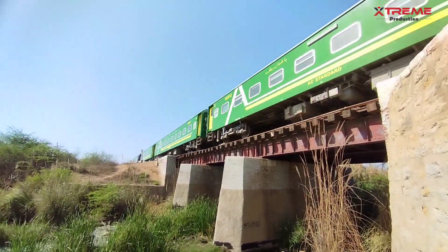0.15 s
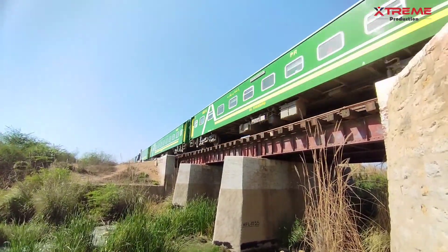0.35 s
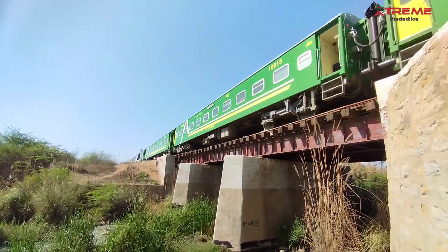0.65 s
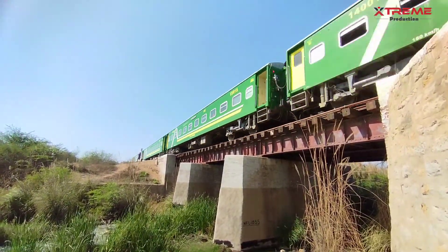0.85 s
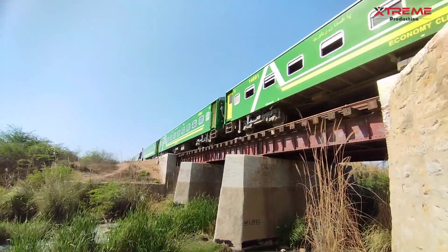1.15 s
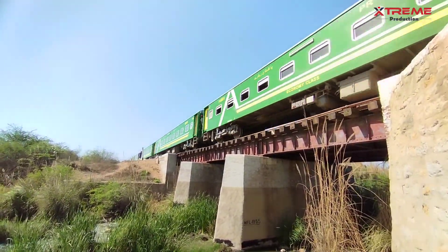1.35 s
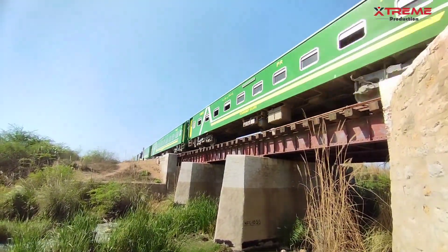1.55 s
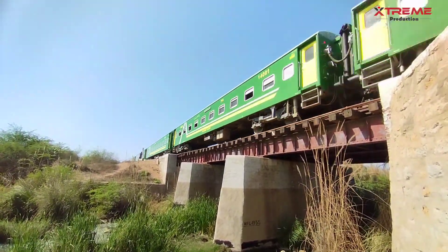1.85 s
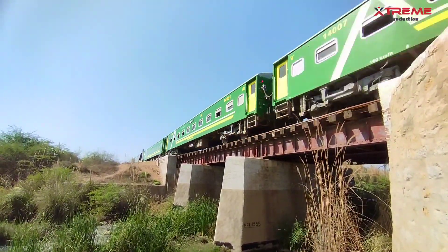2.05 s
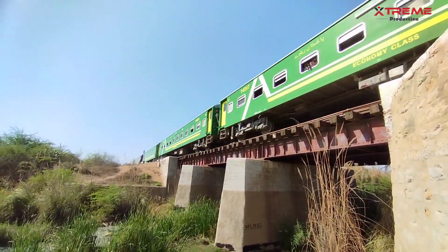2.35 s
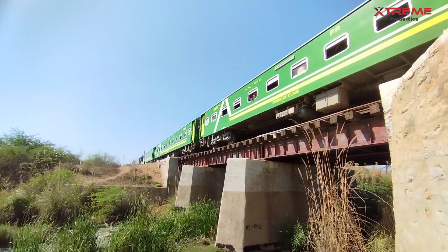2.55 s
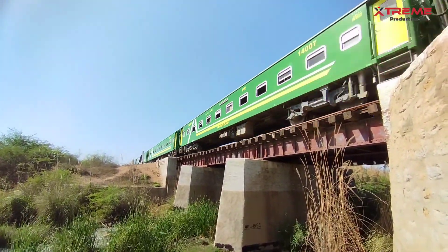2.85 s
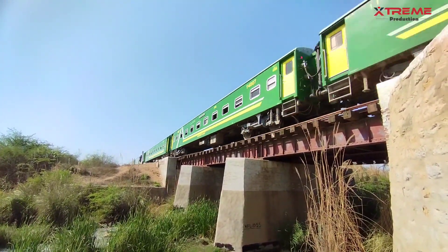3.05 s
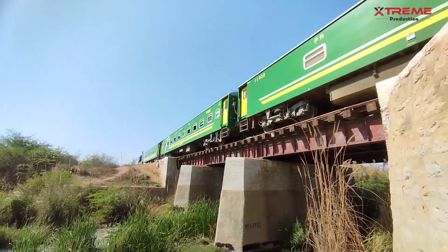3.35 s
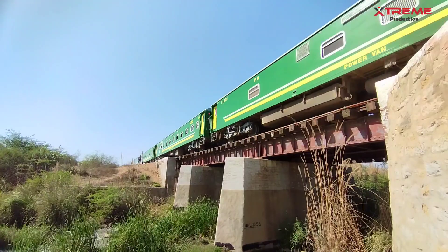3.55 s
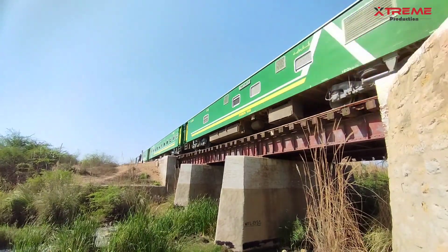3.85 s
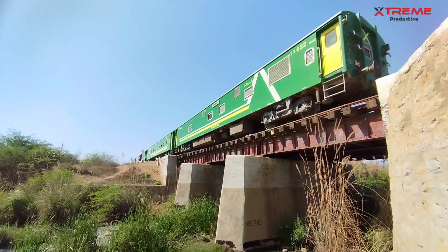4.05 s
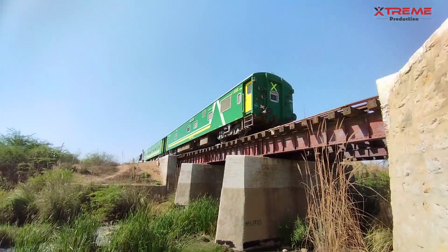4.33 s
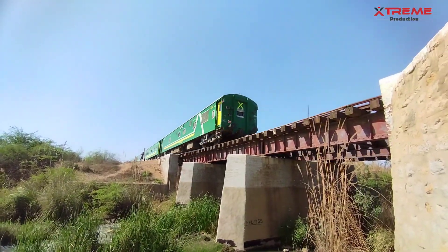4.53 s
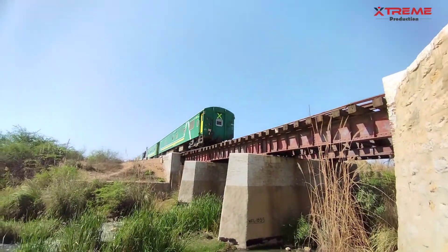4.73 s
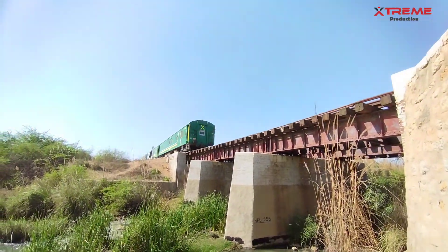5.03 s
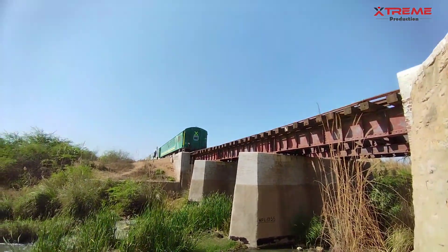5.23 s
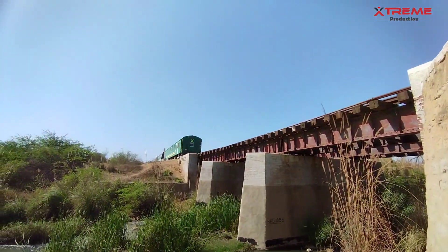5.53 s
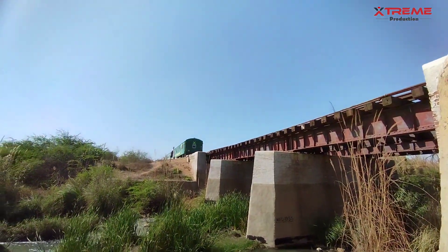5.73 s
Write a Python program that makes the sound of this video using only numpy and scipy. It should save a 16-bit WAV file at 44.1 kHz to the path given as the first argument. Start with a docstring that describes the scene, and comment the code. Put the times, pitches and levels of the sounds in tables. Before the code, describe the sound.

Passenger coaches thunder over a steel girder bridge, wheels clacking in pairs on rail joints, then the last car clears and recedes.

```python
"""Beside the abutment below a steel girder bridge: passenger coaches roll over and recede.
Rough wheels, as random contacts through resonances and colours, keep girders booming and rails hissing.
Both axles of each bogie strike the same row of joints: thud, clang, rattle and decaying steel modes.
Sleepers throb and the last van's generators drone as drifting tones; a narrow rail resonance sings
behind the train. A limiter holds the peaks."""
import sys
import numpy as np
from scipy import signal
from scipy.fft import rfft, irfft
from scipy.io import wavfile
from scipy.ndimage import uniform_filter1d, minimum_filter1d

SR = 44100
rng = np.random.default_rng(int(sys.argv[2]) if len(sys.argv) > 2 else 0)


def generate_wav(signal):
    """Clip the signal to [-1, 1] and save it as 16-bit WAV at the path in sys.argv[1]."""
    frames = np.transpose(np.atleast_2d(signal))
    scaled = np.clip(frames, -1, 1) * 32767
    pcm = np.round(scaled).astype(np.int16)
    wavfile.write(sys.argv[1], SR, pcm)


N = 259749
TIME = np.arange(N) / SR  # s
FREQ = np.maximum(np.fft.rfftfreq(N, 1 / SR), 1)  # Hz

# Rolling level, rising and falling as the train passes: time_s, girder_db, plate_db, hiss_db, treble_db
ROLLING_LEVELS = [(0, -14.3, -28.5, -34, -52.5), (1.8, -14.5, -29.5, -34, -54.5),
                  (3.2, -12.3, -27.5, -33.5, -54), (3.95, -12.5, -25.5, -32.5, -53),
                  (4.23, -14.5, -32.5, -38.5, -57.5), (4.55, -10.3, -26, -31.5, -52.5),
                  (4.8, -13.7, -29.5, -35, -52.5), (5.1, -14, -27, -32.5, -49.5),
                  (5.35, -18.5, -32, -34.5, -46.5), (5.6, -23.5, -36, -36.3, -49.5),
                  (5.89, -19, -31, -34.5, -47.5)]
# Deep end, before the throb's mix trims: time_s, sway_db, throb_db
DEEP_LEVELS = [(0.0, -17, -26), (0.94, -23.5, -23.5), (1.08, -17, -25), (1.78, -25.5, -25.5),
               (2.27, -16.5, -26), (2.76, -24.5, -32), (3.41, -17, -26), (3.58, -21, -27), (3.89, -24, -35),
               (4.34, -18, -26), (4.74, -23, -24)]
# Generators in the last van, before mix trim: time_s, level_db
GENERATOR_LEVEL = [(0, -36), (4.72, -45), (4.82, -19.5), (5.2, -23.5), (5.5, -20.5), (5.89, -17)]
# Rail singing behind the train, before port gains: time_s, level_db
SINGING_LEVEL = [(0, -69), (4.1, -61), (4.4, -41), (4.75, -45), (5.1, -39), (5.35, -42), (5.89, -48)]
# Wheel flange squeaks, before port gains: peak_s, pitch_hz, level_db
FLANGE_SQUEAKS = [(0.812, 3170, -26), (2.82, 3180, -31), (5.26, 3150, -32), (5.76, 2830, -32)]

# Bending modes of the whole span: mode_hz, width_hz, relative_db
SPAN_BENDING = [(58, 16, -4.5), (76.6, 5.9, -2), (87.5, 4.9, -2), (99.6, 8.6, -0.5), (117.6, 20.6, -2.5)]
# Girder modes: mode_hz, width_hz, relative_db
GIRDER_RESONANCES = [(160.2, 31.6, -5.5), (192.7, 31, -4), (219.6, 30.6, -3), (255, 39.7, -2),
                     (305.7, 45, -0.5), (355.1, 42.6, -2.5), (403.3, 45, -6), (502, 175, -15)]
# Modes of a struck joint: mode_hz, relative_db, t60_s; pitch and level vary per strike
STRUCK_STEEL = [(588, -0.5, 0.25), (832, -2.5, 0.21), (938, -5, 0.087), (1230, -7.5, .14), (1863, -4, 0.15),
                (2090, -2, 0.2), (2370, -9, .13), (2695, -4, 0.15), (3165, -3, 0.18), (3510, -8.5, 0.11),
                (3830, -12.5, 0.064), (5930, -10.5, .1)]
# Spectra of web plates, rails and running gear, highest treble noise: freq_hz, relative_db
PLATE_COLOUR = [(350, -19.5), (480, 4.5), (580, -2.5), (700, -0.5), (830, 0), (1000, -4.5), (1250, -12),
                (1700, -16), (3000, -45)]
HISS_COLOUR = [(700, -13), (1200, -1.5), (1600, -0.5), (1950, 1.5), (2600, -0.5), (3400, -3.5),
               (4200, -5.5), (5200, -10), (6200, -11.5), (7200, -24), (8200, -34.5), (11000, -48.5)]
TREBLE_COLOUR = [(5000, -9), (7000, 7), (8200, -6.5), (9300, 1), (10200, -1.5), (11100, -6), (12500, -1),
                 (14000, -1), (16000, -6)]

# Bogies in running order: first_axle_s (at the nearest joint), axle_gap_s, strength_db
BOGIE_PASSES = [(-1.867, .125, 0), (-1.462, .125, -.5), (-.729, .125, 1), (-.346, .122, -1),
                (.404, .125, .3), (.798, .126, -.5), (1.544, .123, .5), (1.938, .128, .3),
                (2.677, .126, -.5), (3.066, .128, -1), (3.808, .125, .5)]
# Rail joints: travel_s (from the nearest joint), thud_db, clang_db, rattle_db, edge_db
RAIL_JOINTS = [(-.632, -11.5, -35, -36, -58), (-.001, -7.5, -16.5, -23, -46),
               (.632, -11, -21.5, -22.5, -46.5), (1.293, -13.5, -28, -31, -49.5),
               (1.928, -19, -32, -36.5, -45)]
# Further single knocks, many of them wheels on joints: time_s, thud_db, clang_db, rattle_db, edge_db
EXTRA_KNOCKS = [(.324, -15, -23, -25, -47), (.687, -8, -26, -29, -55), (1.07, -12, -22, -24, -46),
                (2.195, -15, -24, -23, -45), (2.992, -13, -25, -28, -54), (3.723, -11, -21, -22, -54),
                (3.945, -14, -27, -26, -43), (4.274, -13, -25, -30, -58), (4.374, -12, -24, -27, -50),
                (4.432, -13, -19, -23, -49), (4.808, -20, -30, -30, -54), (5.136, -15, -24, -33, -42),
                (5.25, -9, -18, -22.5, -46)]
# Boost of bogie strikes once the tail has left the span: thud_db, clang_db, rattle_db, edge_db
TAIL_BOOST = (2, 13.5, 12.5, 5.5)
# Swell as each bogie rolls overhead: after_nearest_joint_s, half_length_s, level_db
PLATE_SWELL = (.74, .12, -25)
RAIL_SWELL = (.72, .13, -30.5)
TREBLE_SWELL = (.68, .06, -50)

# Likeness of the two microphone ports: freq_hz, likeness (-1..1, clipped in use)
PORT_LIKENESS = [(60, .98), (130, .93), (290, .97), (450, .97), (640, 0.75), (950, 0.86), (1300, 0.37),
                 (1750, -0.36), (2400, 0.25), (3300, -0.2), (6000, 0), (15000, 0)]
# Port balance: freq_hz, left_minus_right_db
PORT_BALANCE = [(100, 1), (380, -0.5), (700, 3), (950, 1), (1350, 5.5), (1800, 4), (2300, 0.5),
                (3300, -8.5), (4600, -2.5), (6500, -5), (8500, -6), (10000, 1.5), (14000, 4)]

TAIL_CLEAR_S, THUD_LAG_S = 5.17, .003
LOW_RING_DB, HIGH_RING_DB = -8.5, -8.5  # steel modes re clang, re rattle
TOP_HZ = 15700


def undb(db):
    """Decibels to gain."""
    return 10 ** (np.asarray(db) / 20)


def unit(x):
    """Scale to rms 1."""
    return x / np.sqrt(np.mean(x ** 2))


def gains(table):
    """Interpolate dB columns to a gain at every sample."""
    time_s, *columns_db = np.transpose(table)
    return [undb(np.interp(TIME, time_s, column_db)) for column_db in columns_db]


def across(points):
    """Join (Hz, value) points on a log-frequency axis."""
    hz, value = np.transpose(points)
    return np.interp(np.log(FREQ), np.log(hz), value)


def colour(x, points):
    """Filter x by a spectrum, at rms 1."""
    return unit(irfft(rfft(x) * undb(across(points)), N))


def walk(rate_hz):
    """Random levels held 1 / rate_hz and slewed linearly; rms 1."""
    hold = max(int(SR / rate_hz), 1)
    steps = np.repeat(rng.standard_normal(N // hold + 1), hold)
    return unit(uniform_filter1d(steps, hold)[:N])


def chatter(rate_hz, spread_db):
    """Tiny steel-on-steel contacts of random sign and uneven size, arriving by two paths."""
    hit = rng.random((2, N)) < rate_hz / SR
    side, size = rng.standard_normal((hit.sum(), 2)).T
    contacts = np.zeros((2, N))
    contacts[hit] = np.sign(side) * undb(spread_db * size)
    return unit(contacts)


def resonance(hz, width_hz):
    """Response of a steep resonance: two equal stages, mean power 1."""
    stage_width_hz = width_hz / np.sqrt(np.sqrt(2) - 1)
    detuning = FREQ / hz - hz / FREQ
    response = 1 / (1 + 1j * hz / stage_width_hz * detuning) ** 2
    return response / np.sqrt(np.mean(np.abs(response) ** 2))


def ring(modes):
    """Shake each mode with its own stream of contacts."""
    shaken = sum(undb(db) * resonance(hz, width_hz) * rfft(chatter(3000, 2.5))
                 for hz, width_hz, db in modes)
    return unit(irfft(shaken, N))


def tone(hz, wander, wander_hz, flutter_db):
    """Sine whose pitch (fractional wander) and strength drift independently."""
    phase = 2 * np.pi * np.cumsum(hz * (1 + wander * walk(wander_hz))) / SR
    return unit(np.sin(phase) * undb(flutter_db * walk(wander_hz)))


def even(x, span_s):
    """Flatten the slow swells of a random vibration, so its load sets the level."""
    size = max(int(span_s * SR), 1)
    power = uniform_filter1d(np.mean(x ** 2, axis=0), size)
    power = uniform_filter1d(power, size)
    return x / np.sqrt(np.maximum(power, 1e-9))


def riveted(x, spacing_hz, depth_db):
    """Ripple the spectrum, as the many small resonances of a riveted structure do."""
    hz = np.arange(0, SR / 2, max(spacing_hz, 10))
    ripple = np.interp(FREQ, hz, rng.standard_normal(len(hz)))
    return unit(irfft(rfft(x) * undb(depth_db * ripple), N))


def blows(times_s, levels_db, rise_s, t60_s):
    """Envelope of all strikes: each builds, then decays until t60; powers add."""
    power = np.zeros(N)
    for start_s, level_db in zip(times_s, levels_db):
        span = slice(*np.searchsorted(TIME, [start_s, start_s + t60_s]))
        age_s = TIME[span] - start_s
        build = 1 - np.exp(-age_s / rise_s)
        decay = np.exp(-np.log(1000) * age_s / t60_s)
        power[span] += (undb(level_db) * build * decay) ** 2
    return np.sqrt(power)


def overhead(rolling_gain, swell):
    """Gain of a rolling noise: rolling part plus, in power, a swell per passing bogie."""
    after_s, half_s, level_db = swell
    nearness = sum(1 / (1 + ((TIME - first_axle_s - after_s) / half_s) ** 2) ** 2
                   for first_axle_s, *_ in BOGIE_PASSES)
    return np.hypot(rolling_gain, undb(level_db) * np.sqrt(nearness))


def singing_rail():
    """Rubbing flanges squeak and sound a narrow rail resonance, opposite in phase at the ports."""
    note = gains(SINGING_LEVEL)[0] * ring([(3150, 56, 0)])[0] * undb(2.8 * walk(24))
    for peak_s, pitch_hz, level_db in FLANGE_SQUEAKS:
        burst = np.exp(-((TIME - peak_s) / 0.016) ** 2)
        squeak = tone(pitch_hz, wander=0.011, wander_hz=260, flutter_db=2)
        note = note + undb(level_db) * burst * squeak
    return note * np.array([[undb(-4.5)], [-1]])


def generator():
    """Two diesel sets at slightly different speeds beat; a half order lies underneath."""
    first = tone(86.2, wander=.015, wander_hz=9, flutter_db=1.5)
    second = tone(77, wander=.02, wander_hz=8, flutter_db=3)
    half_order = tone(43.1, wander=0.013, wander_hz=5.3, flutter_db=5)
    drone = first + undb(-5.0) * second + undb(-8) * half_order
    return undb(-1.5) * gains(GENERATOR_LEVEL)[0] * drone


def bridge():
    """The span sways, girders boom, and wheels crossing evenly spaced sleepers add a throb."""
    sway_gain, throb_gain = gains(DEEP_LEVELS)
    sway = even(ring(SPAN_BENDING), span_s=0.33)
    shudder = even(ring([(41, 21, 0)]), span_s=.15)
    one_path = np.array([[1], [0]])
    sleepers = tone(41, wander=0.0312, wander_hz=7, flutter_db=.5) * one_path
    throb = undb(-3.5) * shudder + undb(-1.5) * sleepers
    # upper girder modes weaken first as the last wheels leave the near span
    near = undb(np.interp(TIME, [4.6, 5.3], [0, -5]))
    lower = ring([mode for mode in GIRDER_RESONANCES if mode[0] < 280])
    upper = ring([mode for mode in GIRDER_RESONANCES if mode[0] >= 280])
    girders = even(lower + undb(-1.5) * near * upper, span_s=0.069)
    return sway_gain * sway + throb_gain * throb + gains(ROLLING_LEVELS)[0] * girders


def rolling():
    """Wheel roughness rings the web plates and hisses in the rails, never quite evenly."""
    _, plate_gain, hiss_gain, treble_gain = gains(ROLLING_LEVELS)
    plates = riveted(colour(chatter(2000, 2.9), PLATE_COLOUR), spacing_hz=25.02, depth_db=1.5)
    plates = plates * undb(0.42 * walk(70))
    rails = riveted(colour(chatter(7000, 2.4), HISS_COLOUR), spacing_hz=30.1, depth_db=1.5)
    rails = rails * undb(0.83 * walk(45))
    treble = colour(chatter(14000, 2), TREBLE_COLOUR)
    return (overhead(plate_gain, PLATE_SWELL) * plates
            + overhead(hiss_gain, RAIL_SWELL) * rails
            + overhead(treble_gain, TREBLE_SWELL) * treble)


def strikes():
    """Both axles of each bogie hit each joint; extra knocks: time_s, thud, clang, rattle, edge_db."""
    rows = list(EXTRA_KNOCKS)
    for first_axle_s, axle_gap_s, strength_db in BOGIE_PASSES:
        for travel_s, *joint_db in RAIL_JOINTS:
            for axle_s in (0, axle_gap_s):
                time_s = first_axle_s + travel_s + axle_s
                boost_db = (time_s > TAIL_CLEAR_S) * np.array(TAIL_BOOST)
                rows.append((time_s, *(strength_db + np.array(joint_db) + boost_db)))
    return np.array(rows)


def steel_ring():
    """Each strike excites decaying steel modes, with a random mix and tuning."""
    hz, mode_db, t60_s = np.array(STRUCK_STEEL).T[:, :, None]
    out = np.zeros((2, N))
    for start_s, _, clang_db, rattle_db, _ in strikes():
        span = slice(*np.searchsorted(TIME, [start_s, start_s + .18]))
        age_s = TIME[span] - start_s
        detune, weight = rng.standard_normal((2, len(hz), 1))
        # plates ring low, wheels and rails high
        drive_db = np.where(hz < 1500, clang_db + LOW_RING_DB, rattle_db + HIGH_RING_DB)
        pole = 2j * np.pi * hz * (1 + 0.0293 * detune) - np.log(1000) / t60_s
        modes = undb(drive_db + mode_db + 4.0 * weight) * np.exp(pole * age_s)
        phases = np.exp(2j * np.pi * rng.random((2, len(hz))))
        out[:, span] += (phases @ modes).imag * (1 - np.exp(-age_s / 0.0021))
    return out


def joints():
    """A wheel drops into a joint: girder thuds, plates clang, loose parts rattle with a sharp edge."""
    time_s, thud_db, clang_db, rattle_db, edge_db = strikes().T
    bounce = undb(1 * walk(110))  # parts rebound unevenly
    plates = even(colour(chatter(1500, 2.7), PLATE_COLOUR), span_s=0.016)
    loose_parts = riveted(colour(chatter(2500, 2.9), HISS_COLOUR), spacing_hz=45.03, depth_db=1.5)
    girders = even(ring(GIRDER_RESONANCES), span_s=.04)
    # heavy girders answer a little late
    thud = blows(time_s + THUD_LAG_S, thud_db, rise_s=.004, t60_s=0.26) * girders
    clang = blows(time_s, clang_db, rise_s=0.0033, t60_s=0.19) * plates
    # quick blow, then a shake that builds more slowly and lingers
    strike = undb(-5) * blows(time_s, rattle_db, rise_s=0.0021, t60_s=0.091)
    shake = blows(time_s, rattle_db, rise_s=.016, t60_s=0.27)
    rattle = np.hypot(strike, shake) * loose_parts
    treble = colour(chatter(9000, 3), TREBLE_COLOUR)
    edge = blows(time_s, edge_db, rise_s=0.0046, t60_s=0.39) * treble
    return thud + bounce * (clang + rattle + edge)


def ports(paths, lag_s):
    """Long waves reach both ports alike, short ones scatter; the left port hears later."""
    alike = np.clip(across(PORT_LIKENESS), -.985, .985)
    mid, side = rfft(paths) * np.sqrt([1 + alike, 1 - alike]) / np.sqrt(2)
    lean = undb(across(PORT_BALANCE) / 2)
    late = np.exp(-2j * np.pi * FREQ * lag_s)
    left = (mid + side) * lean * late
    right = (mid - side) / lean
    return irfft(np.array([left, right]), N)


def scene():
    """Bridge, wheels and joints spread over both ports; add generators and rail note."""
    structure = bridge() + rolling() + joints() + steel_ring()
    return ports(structure, lag_s=.00007) + generator() + singing_rail()


def record(dry):
    """A look-ahead limiter ducks the loudest peaks, then a steep low-pass cuts the top."""
    ceiling = .9
    need = np.minimum(1, ceiling / (np.abs(dry).max(axis=0) + 1e-9))
    gain = uniform_filter1d(minimum_filter1d(need, size=500), size=500)
    low_pass = signal.ellip(10, .2, 80, TOP_HZ, fs=SR, output="sos")
    return signal.sosfilt(low_pass, dry * gain)


dry = scene()
out = record(dry)
generate_wav(out)
```